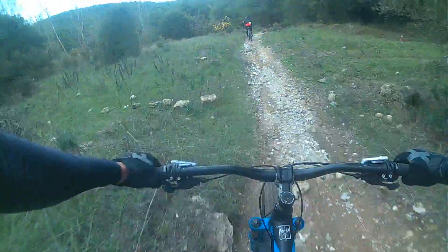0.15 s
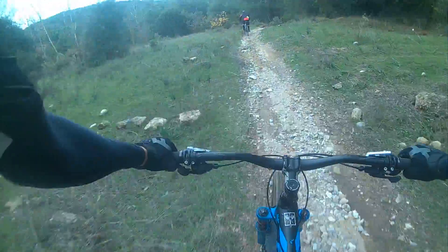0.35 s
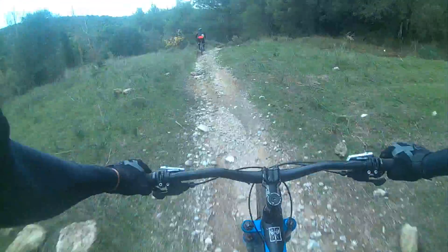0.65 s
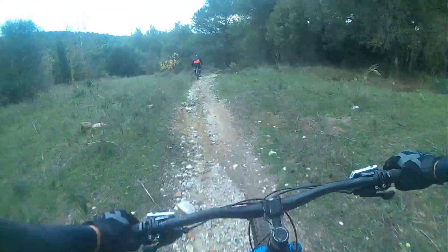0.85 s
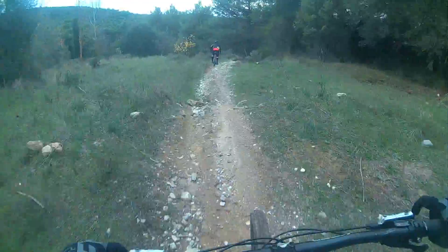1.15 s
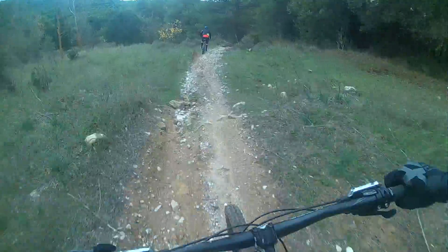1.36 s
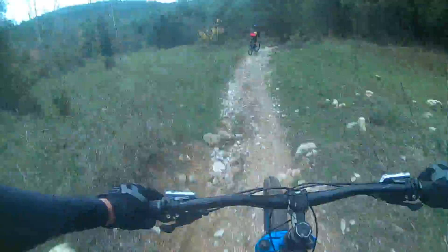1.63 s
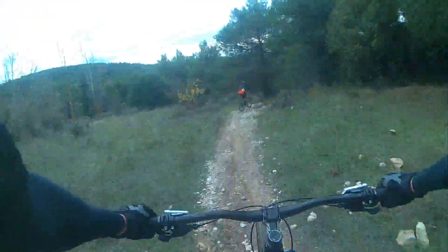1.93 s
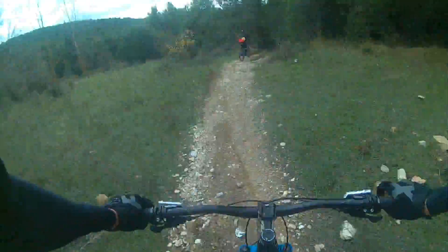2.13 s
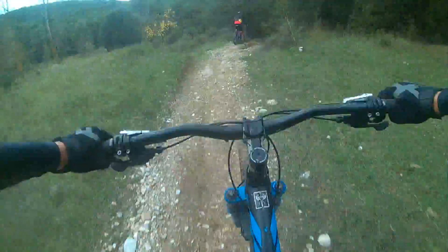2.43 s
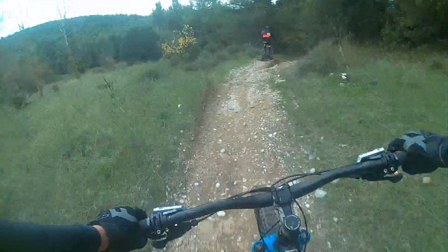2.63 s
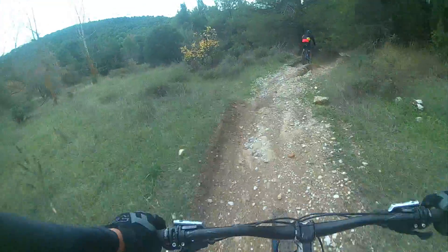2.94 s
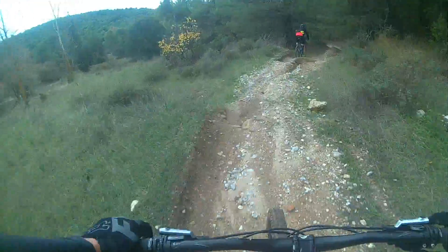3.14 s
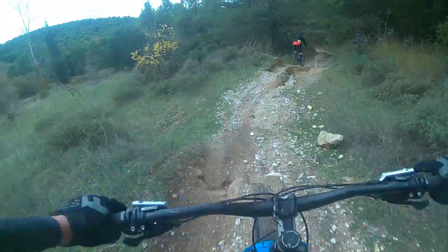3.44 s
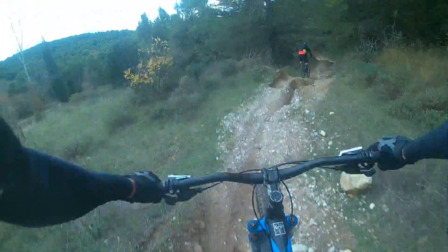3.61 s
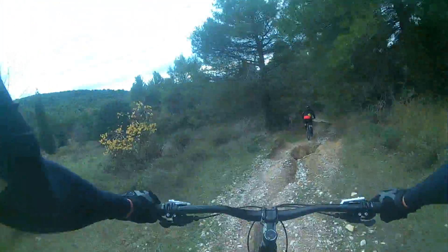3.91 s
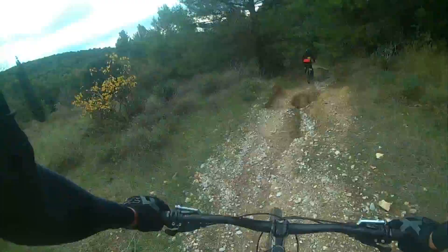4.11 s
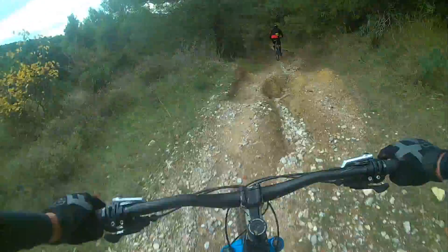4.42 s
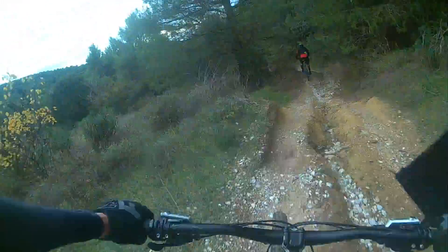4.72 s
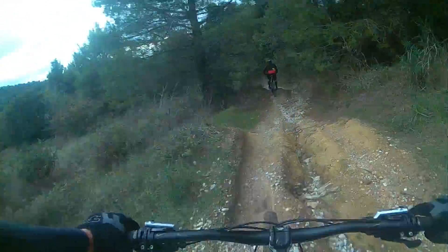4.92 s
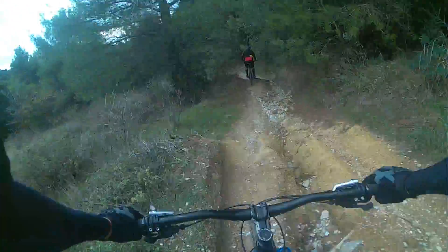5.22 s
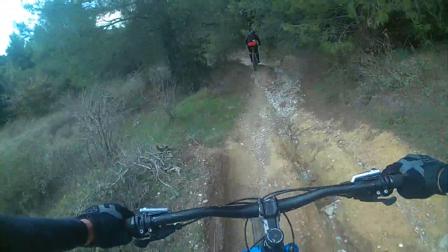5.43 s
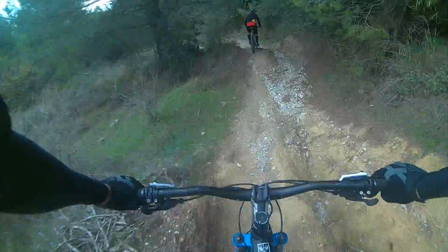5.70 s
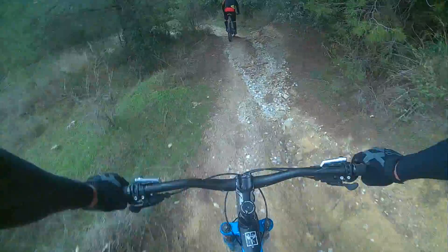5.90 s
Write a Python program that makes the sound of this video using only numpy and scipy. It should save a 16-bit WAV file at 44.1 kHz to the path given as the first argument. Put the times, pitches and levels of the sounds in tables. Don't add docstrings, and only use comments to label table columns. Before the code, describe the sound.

From inside a sealed plastic camera case, a mountain bike is heard descending a stony dirt trail. A hard knock is already ringing at 0 s and dies quickly into light, uneven chatter. Small clacks come at 0.3 and 0.65 s, then a sharp, gritty crack near 0.83 s. Further knocks hit at about 1.45 and 1.6 s, and the loudest, a hollow overloaded clack, at 1.7 s. A crunchy rattle follows at 2.1 s with a faint low hum of the frame. From 2.2 to 3.4 s it is calmer, mostly soft ticking and small bumps. A firm knock lands at 3.56 s, a dense crunch at 4.1 s, another knock at 4.5 s, and a rapid rattling cluster at 5.1-5.25 s. Bumpy chatter, dull thuds and light taps continue to 6 s. The sound is dry, close, boxy and muffled, over very faint hiss.

```python
import sys
import numpy as np
from scipy import signal
from scipy.io import wavfile
from scipy.ndimage import uniform_filter1d

SR = 44100
rng = np.random.default_rng(int(sys.argv[2]) if len(sys.argv) > 2 else 0)


def gain_from_db(level_db):
    decades = np.asarray(level_db, float) / 20
    return 10 ** decades


def output_pcm(signal):
    pcm = np.clip(np.atleast_2d(signal).T, -1, 1) * 32767
    wavfile.write(sys.argv[1], SR, np.round(pcm).astype(np.int16))


N = 267246


def evened(x):
    return x / np.sqrt(np.mean(x ** 2) + 1e-20)


def add(mix, start_s, sound):
    start = round(start_s * SR)
    part = mix[max(start, 0):][:len(sound) + min(start, 0)]
    part += sound[max(-start, 0):][:len(part)]


def causal(points, size=4096):
    point_hz, point_db = np.transpose(points)
    hz = abs(np.fft.fftfreq(size, 1 / SR))
    db = np.interp(np.log(hz + 1), np.log(point_hz + 1), point_db)
    log_gain = np.log(gain_from_db(db))
    return np.fft.ifft(np.exp(np.conj(signal.hilbert(log_gain)))).real[:size // 2]


def ring(hz, width_hz, size=2048):
    t = np.arange(size) / SR
    decay = np.exp(-np.pi * width_hz * t)
    return 2 * np.pi * width_hz / SR * decay * np.sin(2 * np.pi * hz * t)


def ticks(per_s, spread_db):
    hit = rng.random(N) < per_s / SR
    size = np.minimum(rng.exponential(1, N), 4)
    return evened(hit * gain_from_db(spread_db * size) * rng.standard_normal(N))


def flutter(depth_db, per_s):
    span = int(SR / per_s)
    waver = uniform_filter1d(uniform_filter1d(rng.standard_normal(N), span), span)
    return gain_from_db(depth_db * evened(waver))


def strikes():
    # start in seconds, peak in dB, ring in Hz, t60 in seconds, click in dB relative to the peak.
    case_knocks = [(.002, -27, 756, 0.061, 19.5), (.373, -32, 800, .03, 3.5), (0.832, -9.5, 1440, 0.016, -10),
                   (.834, -2.5, 3644, 0.012, -8), (.838, -18.5, 790, 0.042, -13),
                   (1.32, -30, 1240, 0.01, -0.5), (1.6968, -15, 1067, 0.048, -12), (1.484, -22, 321, 0.014, 1),
                   (1.5088, -23, 2150, .015, 10.5), (2.418, -29.5, 1950, 0.006, 10.5),
                   (4.1265, -17.5, 1665, 0.063, 3), (4.13, -20, 2325, 0.034, -4.5),
                   (5.194, -24, 2120, 0.035, -1), (1.563, -24, 775, 0.01, -7.5), (2.112, -20, 880, 0.015, -8),
                   (2.128, -15, 1160, 0.012, -2), (4.161, -24, 2086, 0.014, 13), (4.158, -19, 800, 0.015, -5),
                   (5.12, -23, 1400, 0.04, 0), (5.24, -21, 1254, 0.052, -18),
                   (.312, -20.5, 1170, 0.026, 4), (.655, -21, 1234, 0.017, -17),
                   (.8264, -9, 820, 0.011, -5), (.93, -27, 1198, 0.026, -12), (1.4542, -10, 1130, 0.03, -8),
                   (1.478, -23.5, 780, 0.018, -24), (1.6218, -11, 1266, 0.032, -4),
                   (1.697, 5, 860, 0.055, -33), (2.087, -30.5, 880, 0.033, 1.5),
                   (2.117, -20, 1170, .023, -2), (2.75, -22.5, 805, 0.042, -13), (3.561, -9, 793, 0.03, -6),
                   (4.1086, -22, 807, 0.025, -1.5), (4.1345, -21, 806, 0.066, -24),
                   (4.16, -20, 880, 0.076, 4), (4.2865, -19, 896, 0.025, -8), (4.357, -25, 790, 0.015, -8),
                   (4.525, -13.5, 940, 0.02, -12), (4.982, -25, 770, 0.027, -14),
                   (5.034, -21, 1093, 0.018, -13), (5.094, -17.5, 795, 0.042, -6.5),
                   (5.159, -24, 1270, .03, -9), (5.1735, -10, 1100, 0.025, 2), (5.228, -25, 1270, 0.028, 9)]
    # start in seconds, peak in dB, ring in Hz.
    low_taps = [(.393, -31, 946), (.455, -35.5, 915), (.523, -32, 710), (.882, -32, 905),
                (1.551, -26.5, 766), (1.596, -40, 885), (2.172, -25, 855), (2.235, -35.5, 880),
                (3.155, -40, 863), (3.598, -29.5, 827), (3.809, -38.5, 825), (3.886, -27.5, 820),
                (3.932, -25, 810), (3.972, -30.5, 860), (3.979, -27, 994), (4.104, -33, 1010),
                (4.456, -28, 675), (4.744, -33, 895), (5.996, -35, 800), (6.008, -35, 995)]
    high_taps = [(.249, -35, 1254), (.338, -25, 1126), (.688, -36, 1260), (.96, -34, 1100),
                 (.986, -34, 1263), (1.407, -35.5, 1210), (1.51, -40, 1226), (1.61, -27, 1236),
                 (1.889, -55, 1300), (2.16, -23.5, 1226), (2.319, -31.5, 1066), (2.392, -34.5, 1070),
                 (3.028, -28.5, 1170), (3.14, -33, 1166), (3.508, -33, 1100), (3.864, -32, 1160),
                 (4.251, -34, 1290), (4.818, -37, 1199), (5.078, -26.5, 1170), (5.843, -29, 1131),
                 (5.91, -30, 1097), (5.926, -31, 1230)]
    cracks = [(.311, -18, 1170), (.9868, -21.5, 1280), (1.51, -30.5, 1256), (1.611, -16, 1230),
              (1.889, -26.5, 1230), (2.419, -35, 1020), (2.752, -45, 902), (3.155, -26, 1650),
              (3.5635, -12, 1150), (3.598, -33.5, 914), (3.932, -24, 970), (4.336, -33, 1166),
              (4.525, -24.5, 926), (5.174, -15, 1180)]
    # t60 in seconds, click in dB relative to the peak.
    low_tap_kind = (0.037, -8.5)
    high_tap_kind = (.033, -4.5)
    crack_kind = (.015, 2.6)
    rows = case_knocks
    for contacts, kind in [(low_taps, low_tap_kind), (high_taps, high_tap_kind), (cracks, crack_kind)]:
        rows = rows + [(*contact, *kind) for contact in contacts]
    return rows


def effort():
    # time in seconds, chatter in dB.
    shake = [(0.0, -53.5), (.25, -48.5), (.6, -46), (.99, -46.5), (1.03, -52), (1.43, -51.5), (1.62, -39),
             (1.7, -55), (1.99, -54.5), (2.13, -43.5), (2.55, -51), (3.32, -51.5), (3.57, -47.5),
             (3.6, -49), (3.83, -59), (4.15, -46.5), (5.2, -48), (6.06, -47)]
    # centre in seconds, change in dB, length in seconds.
    lulls = [(0.215, 1, .06), (0.33, -7, .03), (0.754, -3, .03), (1.13, 9, .03), (1.993, -3, .06),
             (2.61, -3, .06), (2.88, 0.5, .05), (3.663, -2.5, .06), (4.21, 1.5, .05), (4.327, -3.5, .035),
             (4.596, -4, .05), (4.793, -11, .035), (4.933, -4.5, .06), (5.21, -5, .02), (5.667, -7.5, .06),
             (5.892, -4.5, .035), (5.973, -5.5, .03)]
    # centre in seconds, chatter in
    # dB, length in seconds, thud in dB relative to the chatter.
    jolts = [(.255, -63, 0.011, -12.5), (.529, -49, 0.027, 6), (0.703, -51, 0.026, 2.5),
             (0.788, -56, .036, 10), (0.835, -25, 0.0053, -12.5), (0.884, -53, 0.035, 5.5),
             (.934, -51, 0.0092, 19), (1.113, -49.5, 0.029, 3), (1.616, -47, 0.035, -6),
             (1.814, -55, 0.097, -24), (2.124, -37, 0.032, 4), (2.175, -45.5, 0.027, -2),
             (2.473, -52.5, 0.04, -20), (2.841, -55, 0.022, -19), (3.469, -53.5, 0.11, -6),
             (3.549, -46, .015, -3), (3.938, -46, 0.0056, -22), (4.13, -35, 0.026, -11),
             (4.166, -40, 0.021, -9), (4.284, -42.5, 0.036, 1), (4.367, -45, 0.011, 7),
             (4.459, -48.5, .034, 8.5), (4.758, -48, 0.037, -1), (5.119, -38, 0.036, -24),
             (5.19, -33, 0.028, -7.5), (5.237, -33.5, 0.024, -18), (5.37, -53.5, 0.029, 8.5),
             (5.596, -49.5, 0.052, -3.5), (5.817, -52.5, 0.1, -9), (5.934, -46, 0.021, 2),
             (.82, -46, .02, -7.5), (.12, -59.5, 0.074, -5), (2.8, -59.5, 0.036, -15),
               (4.38, -58, 0.022, 9.5), (5.289, -63, .06, -1), (5.167, -45, .018, -12),
               (1.25, -69, 0.052, -10), (.3, -49, 0.03, 3.5), (1.11, -53, 0.036, 0),
               (1.645, -54, 0.029, -10), (4.258, -47.5, 0.033, 3), (0.024, -48, 0.057, -5),
               (1.49, -50, 0.034, -6), (3.53, -47, 0.057, -8.5), (4.085, -47, 0.055, -9.5),
               (4.399, -49.5, 0.046, 8.5), (4.502, -51, 0.071, -2), (4.56, -55.5, 0.021, -4),
               (5.092, -50, 0.084, -21)]
    # centre in seconds, chatter in dB, length in seconds.
    bumps = [(0.077, -54, 0.023), (0.171, -55.5, 0.028), (0.416, -59, 0.13), (0.651, -59, 0.024),
             (1.167, -56.5, 0.021), (1.196, -56, 0.0082), (1.33, -64, 0.072), (1.541, -56, 0.026),
             (1.756, -61, 0.018), (1.876, -57, 0.034), (1.949, -61, 0.078), (2.098, -55, 0.065),
             (2.26, -58, 0.037), (2.322, -56.5, 0.026), (2.439, -54.5, 0.01), (2.544, -62, 0.068),
             (2.675, -61, 0.061), (2.985, -61.5, .05), (3.108, -61, 0.042), (3.195, -62, 0.052),
             (3.77, -61.5, .029), (3.835, -59.5, 0.069), (3.901, -59, 0.057), (3.975, -57.5, 0.056),
             (4.038, -54.5, 0.041), (4.665, -65, 0.06), (4.859, -56, 0.11), (4.986, -56, 0.026),
             (5.47, -58, 0.13), (5.697, -56, 0.023)]
    shake_thud_db, bump_thud_db = -10.0, -4.5
    t = np.arange(N) / SR
    shake_s, shake_db = np.transpose(shake)
    chatter_power = gain_from_db(np.interp(t, shake_s, shake_db) - 4.0) ** 2 * flutter(depth_db=4.0, per_s=86)
    for centre_s, drop_db, length_s in lulls:
        chatter_power *= gain_from_db(2 * drop_db * np.exp(-(2 * (t - centre_s) / length_s) ** 2))
    thud_power = chatter_power * gain_from_db(shake_thud_db - 5.0) ** 2
    steady_power = chatter_power.copy()
    for centre_s, db, length_s, thud_db in jolts + [(*bump, bump_thud_db) for bump in bumps]:
        hump = signal.windows.hann(max(int(1.836 * length_s * SR), 96)) ** 2
        start_s = centre_s - len(hump) / SR / 2
        add(chatter_power, start_s, gain_from_db(db + 9.0) ** 2 * hump)
        add(thud_power, start_s, gain_from_db(db + thud_db - 4.5) ** 2 * hump)
    for start_s, db, _, _, click_db in strikes():
        puff_db = min(db, -12) + click_db - 8.0 - 60 * t[:2000] / 0.015
        add(chatter_power, start_s + 0.00011, gain_from_db(puff_db) ** 2)
    return np.sqrt(chatter_power), np.sqrt(thud_power), np.sqrt(abs(chatter_power - steady_power))


def chatter(level):
    # centre in Hz, width in Hz, level in dB.
    modes = [(762.4, 83, -0.5), (880, 41, 2), (1170, 77, -1.5), (1270, 110, -1.5), (1701, 110, -9.5),
             (1926, 88, -8), (3410, 240, -7)]
    # frequency in Hz, level in dB.
    wall_points = [(100, -45.5), (300, -12), (600, -6.5), (1000, 0), (1500, -2), (2300, -18.5),
                   (3000, -12.5), (4500, -28.5), (7000, -54), (16000, -80)]
    wall = causal(wall_points)
    spots = [wall + gain_from_db(db + 12.0) * ring(hz, width_hz) for hz, width_hz, db in modes]
    scale = np.sqrt(sum(np.sum(spot ** 2) for spot in spots))
    out = np.zeros(N)
    for spot in spots:
        contacts = ticks(per_s=500, spread_db=3.0) + 0.82 * rng.standard_normal(N)
        out += signal.oaconvolve(level * contacts, spot)[:N]
    return out / scale


def knocks():
    # start in seconds, peak in dB, ring in Hz,
    # t60 in seconds, click in dB relative to the peak.
    first_knock = [(-.00212, -8, 1250, .045, -30)]
    # frequency in Hz, level in dB.
    snap = [(80, -27), (300, -6), (800, 1), (1500, -2), (2300, -13), (3500, -4.5), (4800, 1.5), (8000, -19),
            (16000, -37)]
    # start in seconds, change in dB, hold in seconds.
    dampings = [
        (.0045, -6, .01),
        (1.4578, -9, .008),
        (1.6255, -9, .012),
        (1.7068, -11.5, .045),
        (3.5655, -12, .024),
        (4.142, -9, .006),
    ]
    contact_s = .0005
    knock_low_hz = 210
    t = np.arange(6000) / SR
    rise = 1 - np.exp(-t / 0.00078)
    click = causal(snap)
    click = click / abs(click).max()
    out = np.zeros(N)
    for start_s, db, hz, t60_s, click_db in first_knock + strikes():
        decay = gain_from_db(db - 0.5 - 60 * t / max(t60_s, .005))
        add(out, start_s + contact_s, decay * rise * np.sin(2 * np.pi * hz * t))
        add(out, start_s + 0.00091, gain_from_db(db + click_db) * click)
    for start_s, drop_db, hold_s in dampings:
        corners_s = [start_s - .001, start_s, start_s + hold_s, start_s + 2 * hold_s]
        out *= gain_from_db(np.interp(np.arange(N) / SR, corners_s, [0, drop_db, drop_db, 0]))
    return signal.lfilter(*signal.butter(2, knock_low_hz, "high", fs=SR), out)


def rolls():
    # centre in seconds, peak in dB, ring in Hz,
    # length in seconds.
    rolling = [(.309, -26, 1170, .006), (.8225, -30, 1120, .008), (.9328, -27, 1250, .009),
               (2.114, -17, 900, .006), (2.119, -14.5, 1100, .006), (2.1222, -17, 860, .004),
               (2.1255, -21, 1500, .004), (2.132, -22, 1300, .005), (2.141, -27, 1200, .007),
               (2.175, -28, 1100, .008), (3.469, -36, 1220, .005), (3.484, -38, 1300, .006),
               (3.511, -35, 1600, .006), (3.5165, -28, 1600, .006), (3.528, -34, 2000, .006),
               (3.548, -30, 1650, .007), (3.549, -32, 740, .01), (3.573, -29, 800, .016),
               (4.083, -28, 890, .005), (4.094, -30, 1000, .006), (4.1125, -24, 800, .008),
               (4.1385, -15.5, 800, .01), (4.149, -27, 900, .005), (4.164, -17.5, 2100, .009),
               (4.168, -19, 1100, .005), (4.172, -22, 1100, .006), (4.177, -29, 800, .007),
               (4.27, -32, 1100, .006), (4.281, -26, 813, .005), (4.2965, -25, 900, .007),
               (4.366, -29, 800, .005), (4.371, -29, 1000, .005), (4.393, -30, 800, .005),
               (4.402, -31, 900, .006), (4.504, -28, 860, .007), (5.101, -23, 900, .005),
               (5.113, -24, 1100, .004), (5.117, -22, 1150, .005), (5.131, -21, 1000, .007),
               (5.179, -18, 1200, .004), (5.186, -14, 1170, .011), (5.193, -18, 1000, .006),
               (5.1965, -19, 1100, .004), (5.204, -20, 1000, .008), (5.235, -25, 800, .006),
               (5.2445, -18, 1200, .008), (5.251, -25, 1200, .005), (1.131, -32, 1230, .006),
               (4.559, -34, 1180, .006), (4.762, -30, 872, .007)]
    # centre in seconds, peak in
    # dB, ring in Hz, length in seconds.
    thumps_and_swells = [(.313, -40, 420, .008), (.829, -29, 255, .01), (.989, -36, 330, .007), (1.005, -56, 120, .02),
                         (1.613, -35, 390, .007), (1.55, -50, 170, .02), (2.421, -39, 350, .008),
                         (3.563, -33, 280, .01), (4.133, -33, 340, .012), (4.762, -48, 300, .012),
                         (4.985, -56, 130, .02), (5.36, -47, 320, .01), (4.275, -39, 300, .012),
                         (.829, -24, 2150, .005), (5.199, -24, 2100, .008), (5.118, -29, 2040, .007),
                         (5.166, -31, 2000, .006)]
    out = np.zeros(N)
    for centre_s, db, hz, length_s in rolling + thumps_and_swells:
        t = np.arange(0, max(1.35 * length_s, .002), 1 / SR)
        swell = gain_from_db(db) * signal.windows.hann(len(t))
        add(out, centre_s - t[-1] / 2, swell * np.sin(2 * np.pi * hz * t))
    return out


def thuds(level):
    # frequency in Hz, level in dB.
    body_points = [(15, -27), (30, -18), (70, -13), (150, 0), (250, 2), (450, -1), (700, -24), (1200, -53)]
    # start in seconds, level in dB, hum in Hz, t60 in seconds.
    hums = [
        (.53, -53.5, 147.6, 0.38),
        (1.102, -37, 159, 0.067),
        (2.16, -51.5, 147, 0.52),
        (2.431, -65.5, 148.4, 1),
        (4.499, -52.5, 144, 0.36),
        (5.361, -53.5, 148, 0.24),
    ]
    body = causal(body_points)
    blows = ticks(per_s=260, spread_db=3.0) + 0.21 * rng.standard_normal(N)
    out = signal.oaconvolve(level * blows, body / np.linalg.norm(body))[:N]
    t = np.arange(SR // 2) / SR
    rise = 1 - np.exp(-t / 0.0016)
    for start_s, db, hz, t60_s in hums:
        add(out, start_s, gain_from_db(db - 60 * t / t60_s) * rise * np.sin(2 * np.pi * hz * t))
    return out


def crunch():
    # centre in seconds, level in dB, length in seconds.
    bursts = [(.8345, -19, .006), (.975, -43, .04), (1.4555, -30, .004), (1.5095, -24, .005),
              (1.624, -28, .006), (2.119, -25, .005), (2.13, -28, .02), (3.512, -36, .012),
              (3.562, -31, .004), (4.132, -20, .018), (4.15, -33, .02), (4.1645, -23, .009),
              (5.115, -32, .02), (5.176, -22, .007), (5.187, -23, .014), (5.198, -27, .012),
              (5.234, -28, .01), (.003, -27, .006)]
    out = np.zeros(N)
    for centre_s, db, length_s in bursts:
        hump = signal.windows.hann(max(int(1.6 * length_s * SR), 64))
        add(out, centre_s - len(hump) / SR / 2, gain_from_db(db) * hump)
    return out


def grit(level):
    # frequency in Hz, level in dB.
    colour_points = [(1200, -32.5), (2200, -4.5), (3000, -5), (3450, 0), (4500, 2), (6000, -16),
                     (9000, -29.5), (16000, -39.5)]
    colour = causal(colour_points)
    contacts = ticks(per_s=1200, spread_db=-0.5) + .5 * rng.standard_normal(N)
    return signal.oaconvolve(level * contacts, colour / np.linalg.norm(colour))[:N]


def scene():
    chatter_level, thud_level, jolt_level = effort()
    shake_grit_db = -25.5
    grit_level = np.hypot(gain_from_db(-1.0) * jolt_level, gain_from_db(shake_grit_db + 11.5) * chatter_level)
    grit_level = np.hypot(grit_level, crunch())
    excess_db = np.maximum(20 * np.log10(chatter_level + 1e-9) + 40, 0)
    eased = chatter_level * gain_from_db(-0.2 * excess_db)
    mix = chatter(eased) + knocks() + rolls() + thuds(thud_level) + grit(grit_level)
    return mix[None]


def top_cut(x):
    return signal.sosfilt(signal.butter(12, 15650, fs=SR, output="sos"), x)


def record(dry):
    # frequency in Hz, level in dB.
    muffle = [(900, 0), (1300, -1), (2200, -1), (2500, -13), (3500, -22.5), (4400, -33.5), (5300, -60),
              (6100, -41.5), (7100, -61), (7900, -31), (10000, -28.5), (12500, -33), (14200, -59.5),
              (16500, -68.5)]
    limit, bass_cut_hz = .18, 115
    clipped = np.clip(-dry, -limit, limit)
    thin = signal.lfilter(*signal.butter(2, bass_cut_hz, "high", fs=SR), clipped)
    muffled = signal.oaconvolve(thin, causal(muffle)[None])[:, 16:N + 16]
    hiss = gain_from_db(-99) * rng.standard_normal(dry.shape)
    return top_cut(muffled + hiss)


dry = scene()
out = record(dry)
output_pcm(out)
```